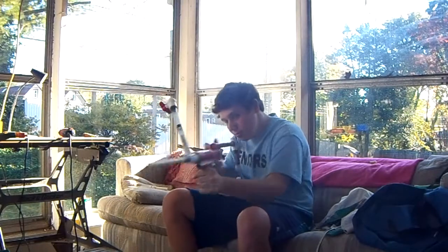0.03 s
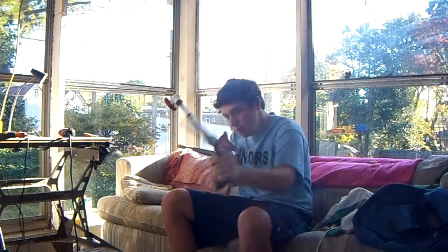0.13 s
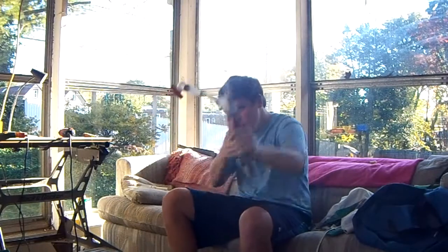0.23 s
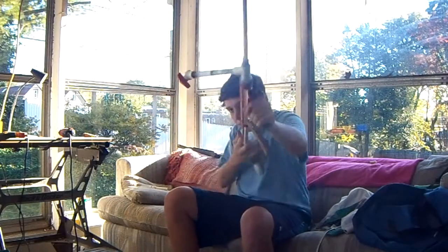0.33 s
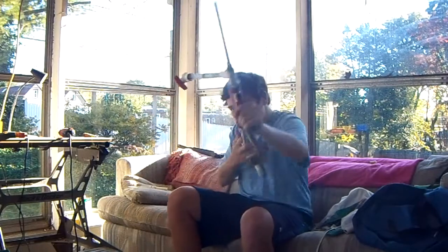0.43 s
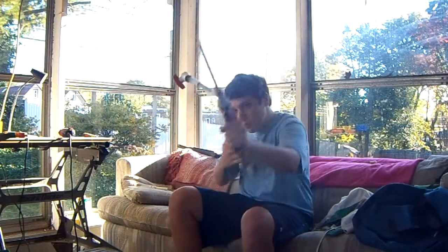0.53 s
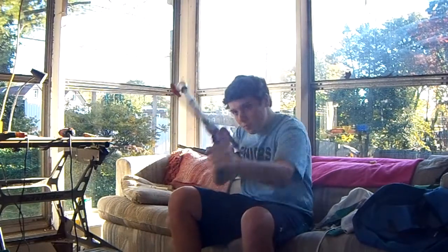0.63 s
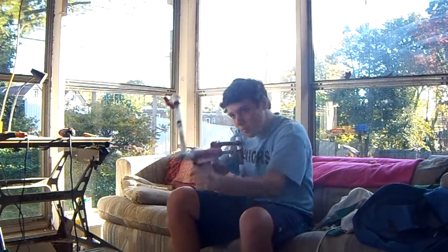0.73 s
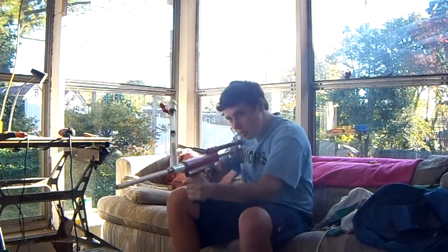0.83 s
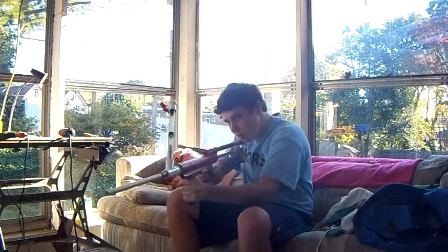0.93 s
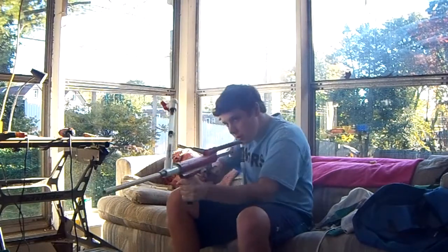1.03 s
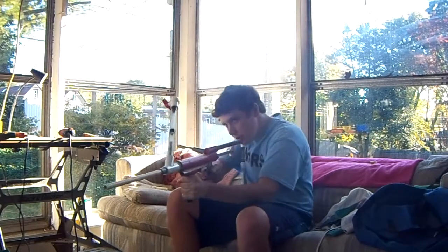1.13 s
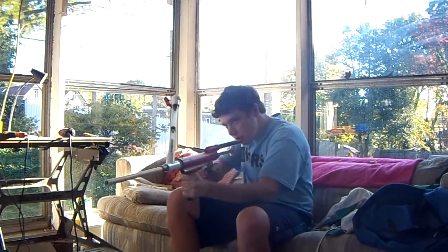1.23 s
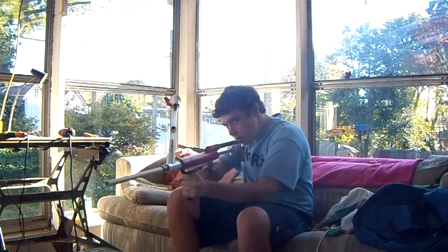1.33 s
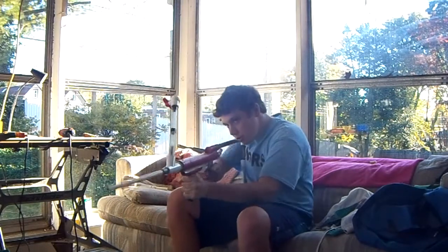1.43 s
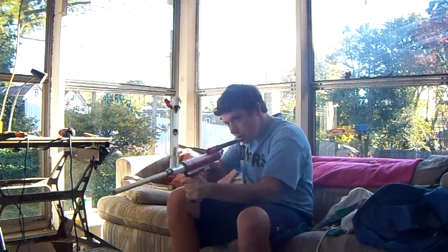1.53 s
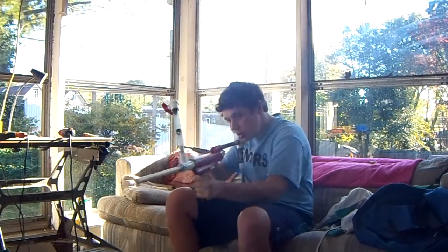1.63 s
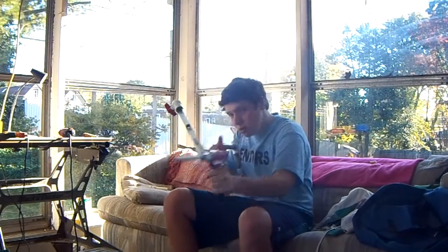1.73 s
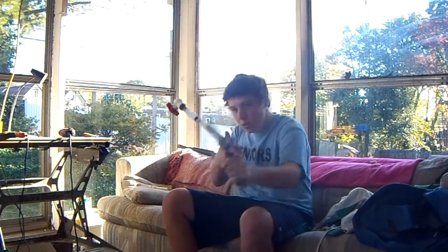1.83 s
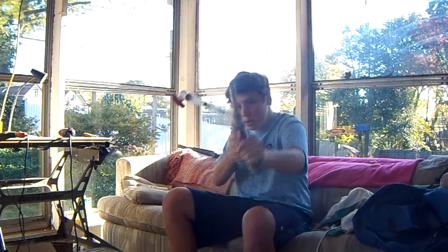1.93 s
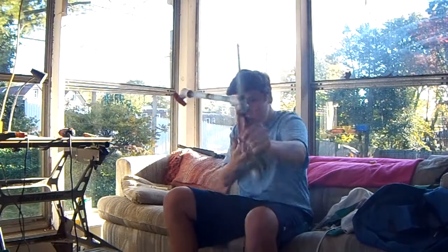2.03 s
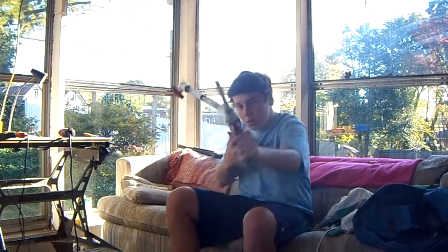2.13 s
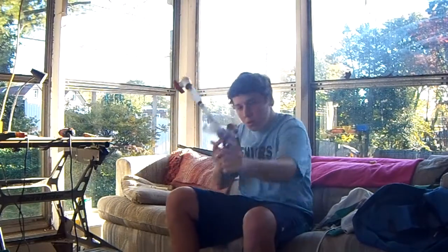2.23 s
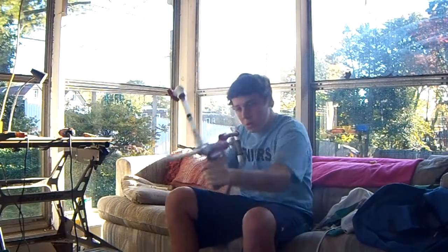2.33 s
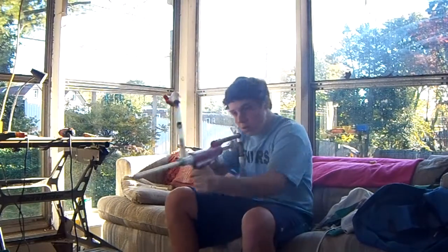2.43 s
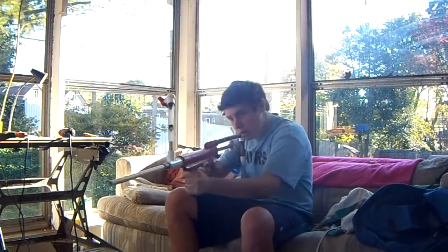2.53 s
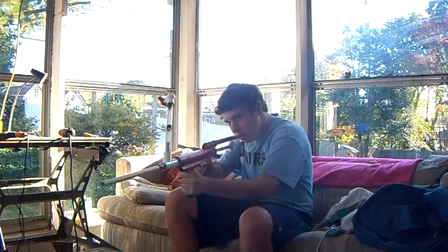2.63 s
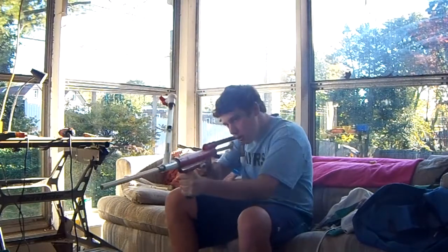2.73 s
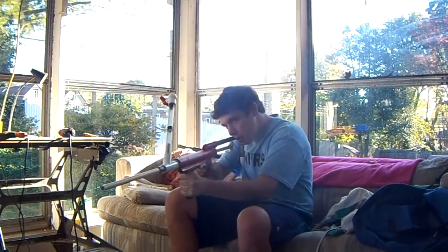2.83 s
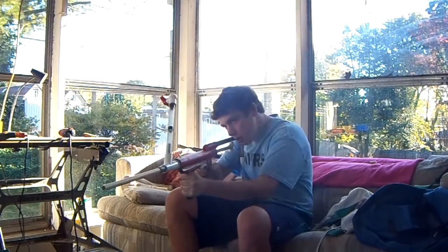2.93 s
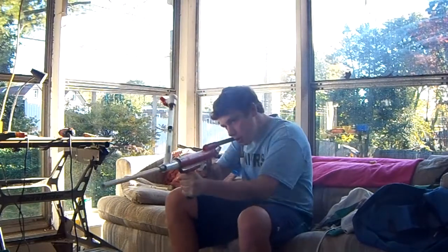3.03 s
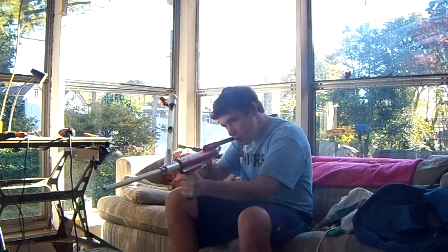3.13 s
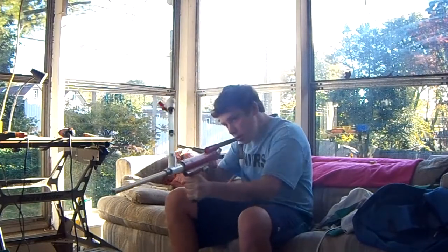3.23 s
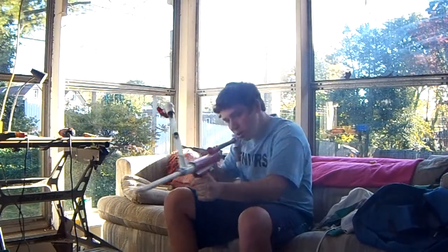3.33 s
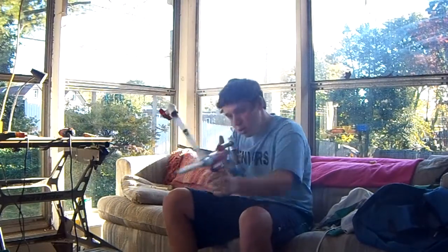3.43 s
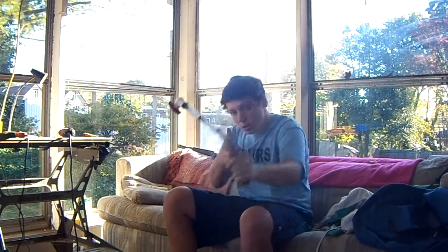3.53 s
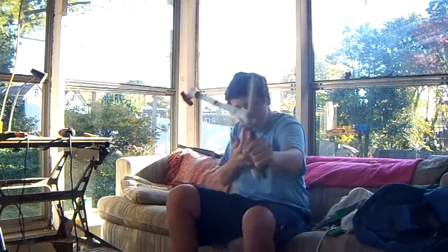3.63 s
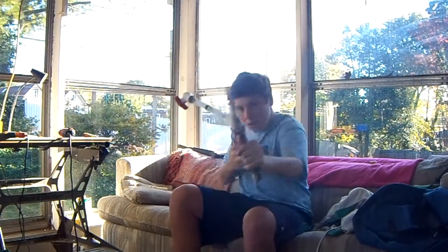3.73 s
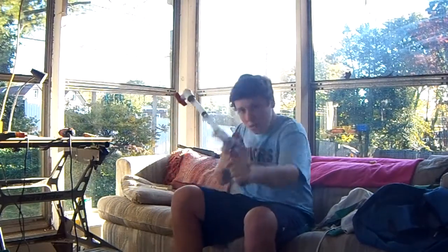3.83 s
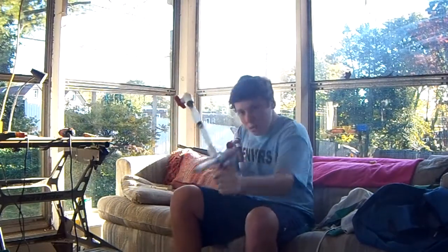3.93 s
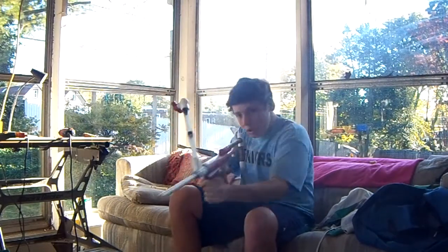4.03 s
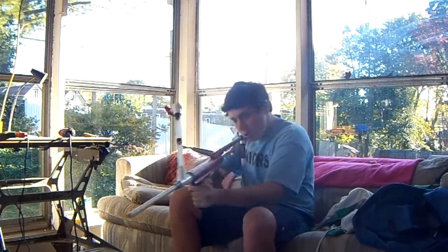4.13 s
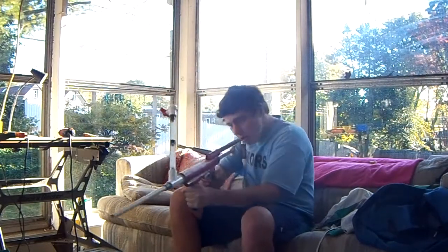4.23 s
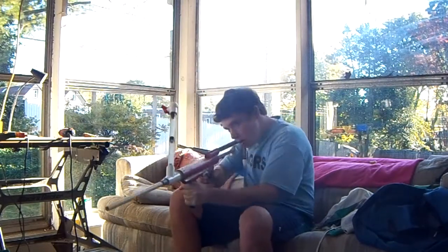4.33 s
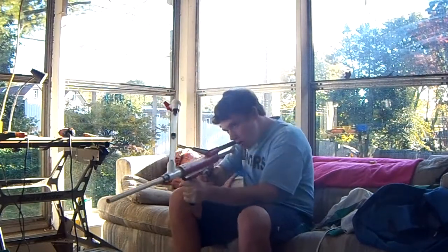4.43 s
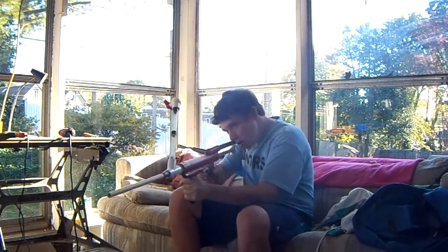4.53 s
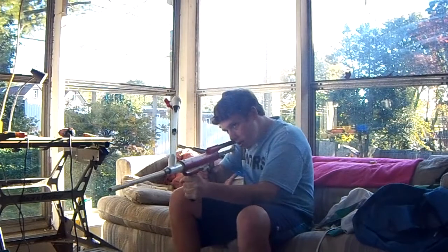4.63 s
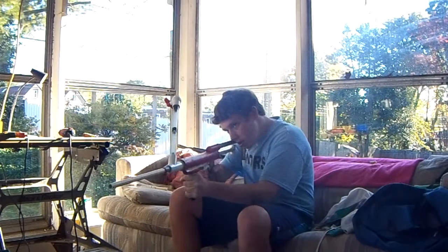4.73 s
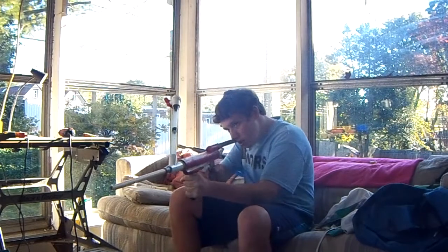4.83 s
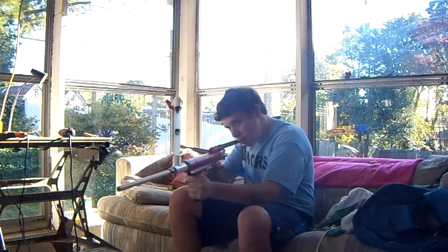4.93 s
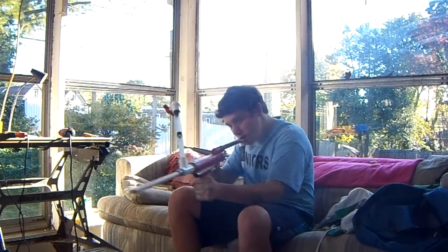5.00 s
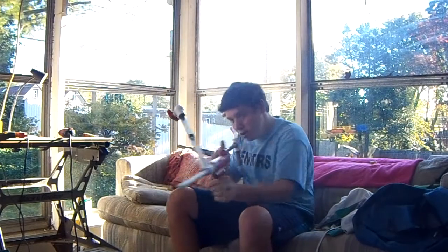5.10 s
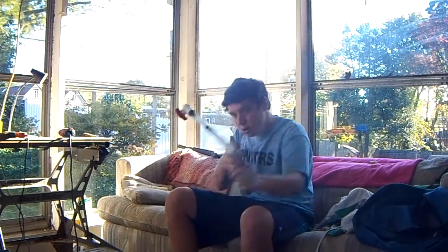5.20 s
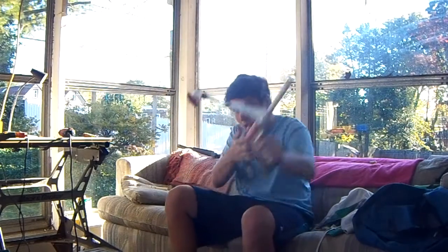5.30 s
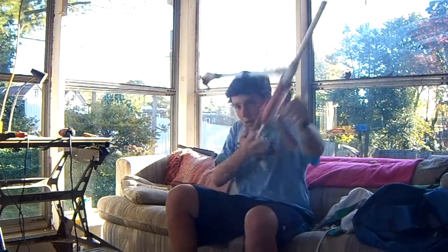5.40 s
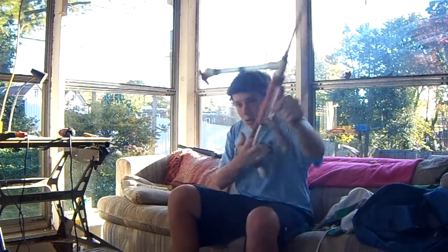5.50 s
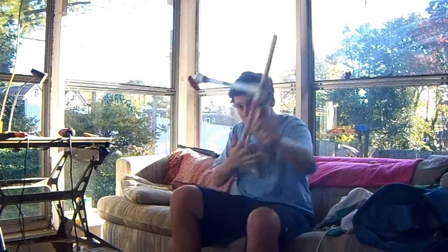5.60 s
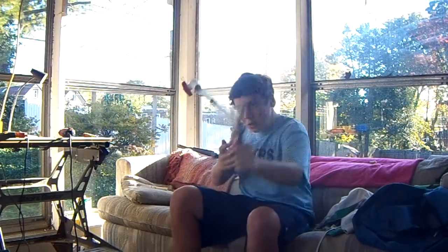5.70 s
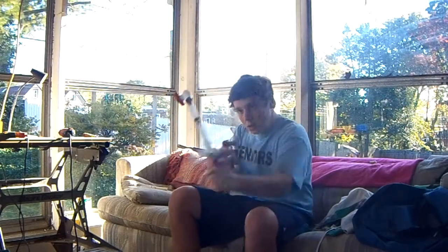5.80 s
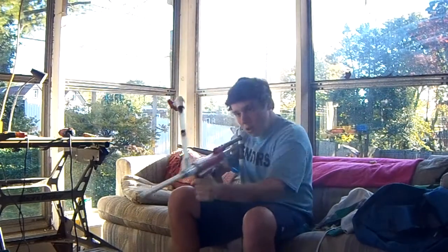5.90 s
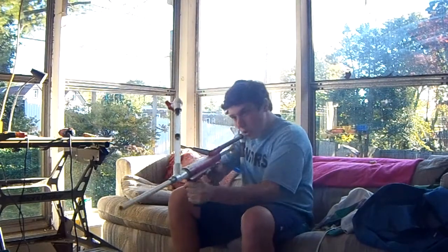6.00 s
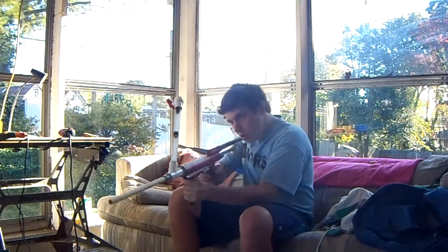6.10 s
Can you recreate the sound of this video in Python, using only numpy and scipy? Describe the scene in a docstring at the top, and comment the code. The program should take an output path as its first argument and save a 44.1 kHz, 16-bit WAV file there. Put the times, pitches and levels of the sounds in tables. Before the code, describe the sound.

In a glassed-in room, a homemade plastic dart blaster is primed with a quick scrape and a bright clack. It then fires three times, each shot a sharp, airy snap with the dart smacking a wall almost at once, and is primed again after each. One dart bounces with a slap. Faint plastic ticks and a low hush lie between, all picked up by a nearby microphone.

```python
"""A glassed-in room, one microphone, within overload range of a homemade plastic-pipe dart blaster.
On each shot the catch slips, the spring plunger slams with a burst of air and the dart smacks a wall.
Priming follows: a quickening scrape of the slide that ends in the clack of the catch. Hands and loose
parts tick on the plastic over a low hush. We come in on the tail of one shot; three more follow."""
import sys
import numpy as np
from scipy import signal
from scipy.fft import rfft, irfft
from scipy.io import wavfile
from scipy.ndimage import uniform_filter1d

SR = 44100
rng = np.random.default_rng(int(sys.argv[2]) if len(sys.argv) > 2 else 0)


def write(x):
    x = np.atleast_2d(x).T
    wavfile.write(sys.argv[1], SR, np.round(np.clip(x, -1, 1) * 32767).astype(np.int16))


N = 271656
LEAD = SR // 4  # samples of run-in before time zero


def shots(mix):
    """The blaster fires: the plunger strikes home and, one flight later, the dart reaches the wall."""
    # slam t/s, slam level/dB, rush length/s, dart flight/s, smack level/dB, tilt/(dB/octave), t60/s
    firings = [(-.14, -14, .016, 0.039, -5, -0.3, 0.086), (1.56, -7.5, 0.02, 0.045, -3.5, 0.63, 0.084),
               (3.193, -7.5, .018, .041, -6.5, 1.2, 0.15), (4.944, -7, .014, 0.045, -9, 1.27, 0.19)]
    for s, slam_db, rush_s, flight_s, smack_db, tilt_db, t60_s in firings:
        plunger(mix, s, slam_db, rush_s)
        dart_smack(mix, s + flight_s, smack_db, tilt_db, t60_s)


def plunger(mix, s, db, rush_s):
    """A brief rising rush of noise is heard, then the plunger slams at time s with a burst of air."""
    # mid-range rush of noise just before the slam: f/Hz, level/dB
    rush_spectrum = [(100, -11.5), (400, -5.5), (1300, -4), (2600, -2.5), (4000, -14.5), (8000, -11.5),
                     (12500, -14)]
    # spectrum of the slam and its air: f/Hz, level/dB
    slam = [(35, -38), (60, -11), (268, -9.5), (479, -1), (700, -18), (1000, -5.5), (1250, -10.5),
            (1670, -3), (2240, -4.5), (2500, -4), (3580, -6), (10900, -6), (12500, -17), (16200, -42.5),
            (22000, -120)]
    remaining = np.arange(1, 0, -1 / (SR * rush_s))
    fade_in = np.minimum((1 - remaining) / 0.33, 1)
    rush = gain_of(db - 10 - 4.5 * remaining) * fade_in
    add(mix, s - rush_s, signal.fftconvolve(room_noise(rush, wet_db=-7.5), colour(rush_spectrum)))
    add(mix, s, blow(db, colour(slam), rise_s=0.0015, t60_s=0.084, wet_db=7))
    add(mix, s, gain_of(db - 2) * ringing())


def dart_smack(mix, s, db, tilt_db, t60_s):
    """The dart hits the wall and sets it ringing; the microphone gets more room than direct sound."""
    # spectrum of the impact: f/Hz, level/dB
    smack = [(24, -42.5), (40, -19.5), (100, -19.5), (205, -6.5), (300, -7.5), (600, -3), (850, -6.5),
             (1580, -1.5), (2400, -5), (3200, -8), (6000, -12.5), (11400, -17), (13000, -29)]
    add(mix, s, blow(db, colour(smack, tilt_db), rise_s=0.0019, t60_s=t60_s, wet_db=9))
    add(mix, s, gain_of(db + 4) * ringing())


def ringing():
    """Barrel and wall ring after a blow, with a new balance of modes each time."""
    # modes: f/Hz, level/dB, t60/s
    modes = [(470, -16, 0.055), (619.6, -10, 0.13), (1270, -20, 0.088), (1452, -17, .27), (1574, -18, .16),
             (2340, -21, 0.1), (2800, -23, 0.094)]
    return sum(ring(hz, db + 3 * rng.standard_normal(), t60_s) for hz, db, t60_s in modes)


def dart_bounces(mix):
    """The foam dart bounces on and slaps a hard surface."""
    # landings: t/s, level/dB, tilt/(dB/octave)
    bounces = [(1.764, -9, -0.75), (3.428, -36, 0.2)]
    # spectrum of the foam's slap: f/Hz, level/dB
    slap = [(35, -57.5), (60, -25), (256, -7), (655, -8.5), (896, -7), (958, -6), (2000, 0.5),
            (10900, -5.5), (12500, -15), (16200, -47), (22000, -120)]
    for s, db, tilt_db in bounces:
        add(mix, s, blow(db, colour(slap, tilt_db), rise_s=0.00022, t60_s=0.042, wet_db=4))


def rubbing(mix):
    """Slide and hand rub unevenly on the pipe: slow rubbing sounds hollow, fast rubbing hisses."""
    # slide pulls: t/s, creep length/s, slide length/s, creep level/dB, level once free/dB
    pulls = [(.372, 0.039, 0.071, -39, -21), (2.078, 0.037, .066, -35.5, -21),
             (3.722, 0.036, 0.057, -34, -18.5), (5.5, 0.039, 0.069, -35, -20.5)]
    # hand brushes: t/s, length/s, level/dB, brightness/dB
    brushes = [(0.306, 0.052, -49.5, -6.5), (3.563, 0.035, -51, -7), (4.709, 0.039, -60, 4.5),
               (5.399, 0.054, -57, -3), (5.469, 0.022, -53.5, -0.5)]
    # broad, bright hiss: f/Hz, level/dB
    hiss_spectrum = [(59, -54), (100, -28), (395, -30), (580, -20), (1270, -21.5), (3160, -1), (3570, -6.5),
                     (5040, 0), (5690, -7), (7240, -3.5), (8690, -0.5), (11500, -0.5), (12500, -11),
                     (16200, -46), (22000, -120)]
    # spectrum of the hollow pipe: f/Hz, level/dB
    pipe = [(200, -27.5), (500, -15), (950, -11.5), (1150, -13), (1450, -7.5), (1750, -11), (3000, -9.5),
            (5000, -14.5), (9000, -37.5)]
    strokes = [(s, slide_pull(*row)) for s, *row in pulls]
    strokes += [(s, hand_brush(*row)) for s, *row in brushes]
    for s, (db, bright_db) in strokes:
        snags = flutter(SR // 4, span=150)[:len(db)]
        friction = gain_of(db + 2.2 * snags)
        bright = gain_of(bright_db)
        hiss = room_noise(friction * bright, wet_db=-1.5)
        hollow = room_noise(friction / bright ** 2, wet_db=1)
        add(mix, s, signal.fftconvolve(hiss, colour(hiss_spectrum)))
        add(mix, s, signal.fftconvolve(hollow, gain_of(-19.5) * colour(pipe)))


def slide_pull(creep_s, slide_s, creep_db, free_db):
    """Level and brightness in dB as the slide takes up, creeps, breaks free, quickens and stops."""
    take_up_s, break_s, let_go_s = 0.016, 0.028, 0.018
    growth_db_per_s = 207.5
    stages = np.cumsum([0, take_up_s, creep_s - take_up_s, break_s, slide_s - break_s, let_go_s])
    top_db = free_db + growth_db_per_s * (slide_s - break_s)
    t = np.arange(0, stages[-1], 1 / SR)
    level_db = np.interp(t, stages, [creep_db - 23.5, creep_db, creep_db, free_db, top_db, top_db - 11.5])
    bright_db = np.interp(t, stages, [-12.5, -5.5, -5.5, 0.5, -1, -1])
    return level_db, bright_db


def hand_brush(length_s, db, bright_db):
    """Level and brightness in dB of a light touch on the pipe: quick rise, slower fall."""
    progress = np.arange(0, 1, 1 / (SR * length_s))
    return db + np.interp(progress, [0, 0.28, 1], [-6, 0, -12.5]), bright_db


def catch_clacks(mix):
    """The catch engages as the slide bottoms out with one push of air and its recoil."""
    # catch strikes: t/s, clack level/dB, thump level/dB
    strikes = [(.483, -4.5, -18.5), (2.187, -4.5, -22), (3.823, -5, -24), (5.612, -3.5, -46),
               (5.621, -20, -23.5)]
    # spectrum of the catch: f/Hz, level/dB
    clack = [(35, -58.5), (60, -25), (560, -20.5), (916, -16.5), (1250, -19), (2090, -4), (3580, -7),
             (4570, 0.5), (9350, -3), (12500, -17.5), (16200, -39), (22000, -120)]
    push_s = 0.00081
    age = np.arange(SR // 20) / SR / push_s
    thump = age * (2.4 - age) * np.exp(-age)
    for s, db, thump_db in strikes:
        add(mix, s, blow(db, colour(clack), rise_s=0.00051, t60_s=0.033, wet_db=2.5))
        add(mix, s, gain_of(thump_db) * thump)


def plastic_ticks(mix):
    """A spent dart, hands and loose parts knock on hollow plastic: a broad tick and one ringing mode."""
    # knocks: t/s, level/dB, ring f/Hz, ring t60/s
    knocks = [(0.096, -21, 838, 0.023), (0.116, -30.5, 1415, 0.062), (.297, -40, 805, 0.014),
              (0.312, -43.5, 1390, 0.043), (0.377, -39.5, 1485, 0.13), (.779, -39, 1450, 0.037),
              (.781, -51, 1960, 0.37), (0.802, -46, 1645, 0.064), (0.865, -52.5, 1560, .08),
              (2.055, -29.5, 7550, 0.0016), (2.084, -42.5, 1480, .1), (3.782, -34, 595, 0.13),
              (4.024, -44, 1020, 0.021), (5.398, -37, 668, 0.037), (5.399, -43, 7500, .004),
              (5.42, -43, 8110, .006), (5.502, -38, 1490, 0.085)]
    for s, db, hz, t60_s in knocks:
        octaves = 3 * np.sqrt(0.04 / t60_s)  # the shorter the ring, the broader the tick
        hump = [(hz / 2 ** octaves, -40), (hz, 0), (hz * 2 ** octaves, -40)]
        wet_db = 1.5 - 0.5 * np.log2(hz / 1000)  # small bright clicks stir the room less
        add(mix, s, blow(db, colour(hump), rise_s=0.00068, t60_s=0.018, wet_db=wet_db))
        add(mix, s, ring(hz, db + 1.5, t60_s))


def blow(db, taps, rise_s, t60_s, wet_db):
    """A short burst of chattering contact, coloured by what it strikes, heard across the room."""
    t = np.arange(SR // 8) / SR
    burst = np.minimum(t / rise_s, 1) * gain_of(db - 60 * t / t60_s)
    return signal.fftconvolve(room_noise(burst, wet_db), taps)


def ring(hz, db, t60_s):
    """One dying mode, struck at a random phase, swelling over its first cycle."""
    t = np.arange(SR // 3) / SR
    envelope = np.minimum(t * hz, 1) * gain_of(db - 60 * t / max(t60_s, 0.002))
    return envelope * np.sin(2 * np.pi * (hz * t + rng.random()))


def room_noise(envelope, wet_db):
    """Shaped noise at the microphone: the direct sound plus echoes that linger band by band."""
    # reverberation of the glassed-in room: f/Hz, t60/s
    reverb = [(100, 0.13), (400, 0.17), (700, 0.19), (1500, 0.23), (2800, 0.24), (7000, 0.25),
              (12000, 0.25)]
    n, hop = 2 * SR // 3, 32
    frames = dict(fs=SR, nperseg=256, noverlap=256 - hop)
    direct, diffuse = rng.standard_normal((2, n))
    envelope = np.pad(envelope, (0, n - len(envelope)))
    hz, t, bands = signal.stft(diffuse, **frames)
    linger = gain_of(-120 * t / np.maximum(value_at(reverb, hz), 0.05)[:, None])  # decay of power
    linger *= 1 - np.exp(-t / 0.0047)  # reflections build up
    linger /= linger.sum(1, keepdims=True)
    source_power = np.interp(t * SR, np.arange(n), uniform_filter1d(envelope ** 2, size=hop))
    echo_power = signal.fftconvolve(linger, source_power[None], axes=1)[:, :len(t)]
    echoes = signal.istft(bands * np.sqrt(abs(echo_power)), **frames)[1][:n]
    clumps = flutter(n, span=200)  # echoes arrive in bunches
    return direct * envelope + gain_of(wet_db + 1.2 * clumps) * echoes


def hush():
    """Steady room tone and microphone noise, with a faint band of hiss from the electronics."""
    # spectrum of the noise floor: f/Hz, level/dB
    floor = [(12, -23.5), (20, -0.5), (50, -4.5), (90, -7), (185, -12.5), (450, -14), (1070, -17),
             (2700, -21.5), (6400, -24.5), (8700, -26.5), (11700, -21.5), (13000, -34.5)]
    # band of hiss: centre f/Hz, width/Hz, level/dB
    whine = (7850, 560, -65)
    centre_hz, width_hz, whine_db = whine
    hz = np.fft.rfftfreq(N, 1 / SR)
    hump = np.exp(-((hz - centre_hz) / width_hz) ** 2)
    wide = irfft(rfft(rng.standard_normal(N)) * gain_of(value_at(floor, hz)), N)
    narrow = irfft(rfft(rng.standard_normal(N)) * hump, N)
    return gain_of(-55) * unit_rms(wide) + gain_of(whine_db) * unit_rms(narrow)


def colour(spectrum, tilt_db=0):
    """Minimum-phase impulse response of energy 1: the spectrum, tilted tilt_db an octave about 2 kHz."""
    hz = np.fft.rfftfreq(4096, 1 / SR)
    level_db = value_at(spectrum, hz) + tilt_db * np.log2((hz + 50) / 2000)
    log_gain = np.log(gain_of(np.maximum(level_db, -90)))
    mirrored = np.concatenate([log_gain, log_gain[-2:0:-1]])
    phase = -signal.hilbert(mirrored).imag
    taps = np.fft.ifft(np.exp(mirrored + 1j * phase)).real[:2048]
    return taps / np.linalg.norm(taps)


def flutter(n, span):
    """Random wobble of rms 1, smoothed over span samples."""
    return unit_rms(uniform_filter1d(rng.standard_normal(n), size=span))


def gain_of(db):
    """Decibels to an amplitude factor."""
    return 10 ** (np.asarray(db) / 20)


def unit_rms(x):
    """Scales to rms 1."""
    return x / np.sqrt(np.mean(x ** 2) + 1e-20)


def value_at(points, hz):
    """Reads a table on a log-frequency axis."""
    f, value = np.transpose(points)
    return np.interp(np.log(hz + 1), np.log(f + 1), value)


def add(mix, s, sound):
    """Mixes a sound in at s seconds."""
    part = mix[LEAD + round(s * SR):][:len(sound)]
    part += sound[:len(part)]


def scene():
    """Firing, priming and handling over the room tone, in mono at the microphone."""
    mix = np.zeros(LEAD + N)
    for source in (shots, dart_bounces, rubbing, catch_clacks, plastic_ticks):
        source(mix)
    return (mix[LEAD:] + hush())[None]


def record(dry):
    """The microphone input overloads at a fairly hard knee; a steep low-pass then trims the top."""
    ceiling, knee, edge_hz = gain_of(-2.8), 3, 12500
    clipped = dry / (1 + abs(dry / ceiling) ** knee) ** (1 / knee)
    low_pass = signal.firwin(511, edge_hz, window=("kaiser", 9), fs=SR)
    return signal.oaconvolve(clipped, low_pass[None], "same")


dry = scene()
out = record(dry)
write(out)
```